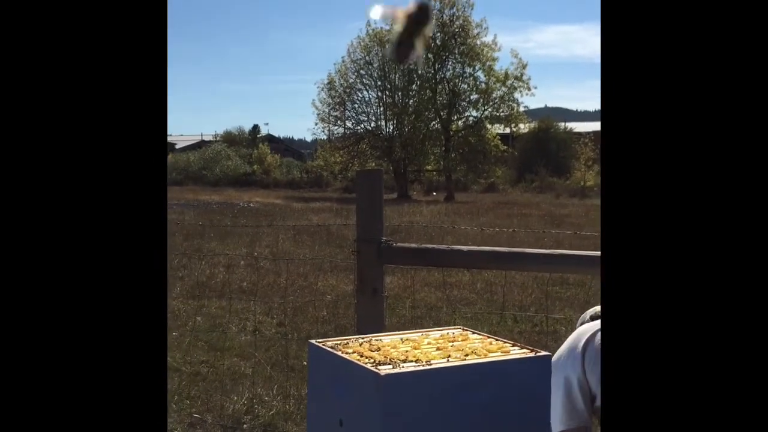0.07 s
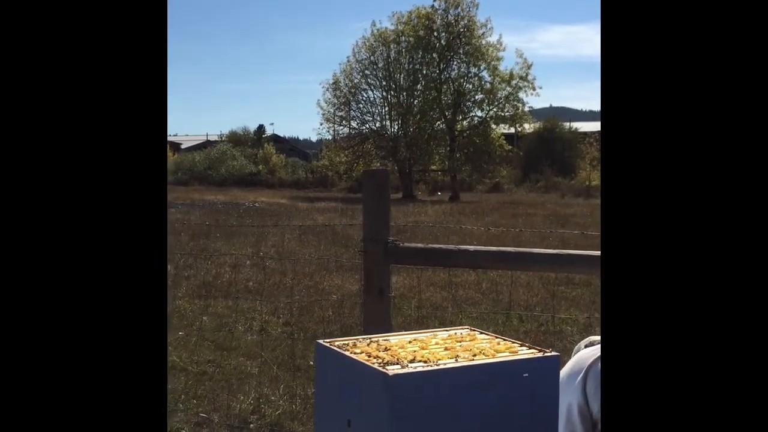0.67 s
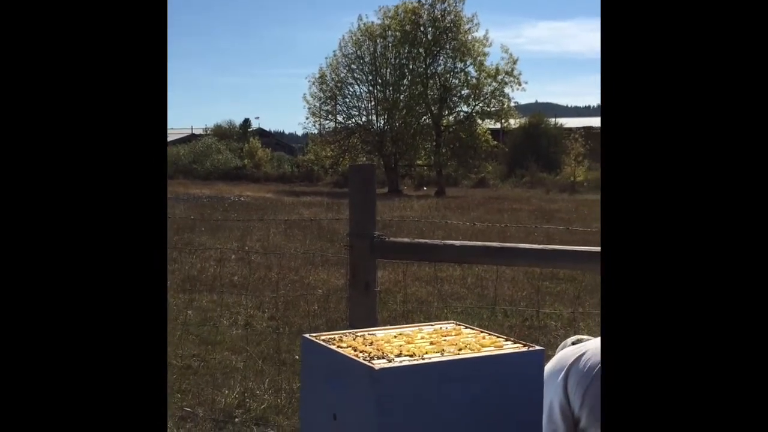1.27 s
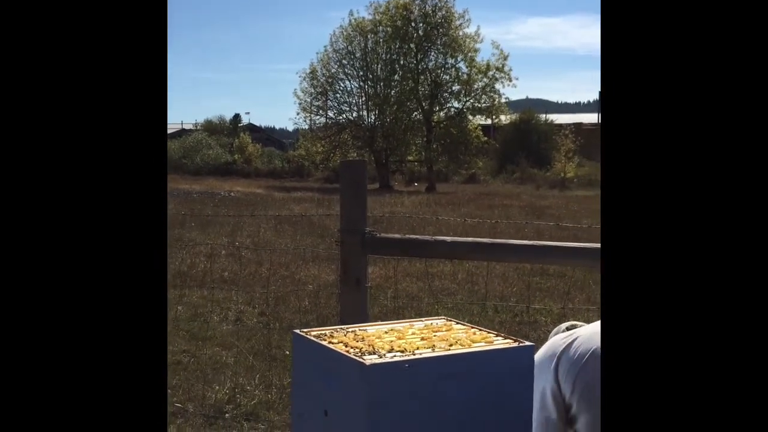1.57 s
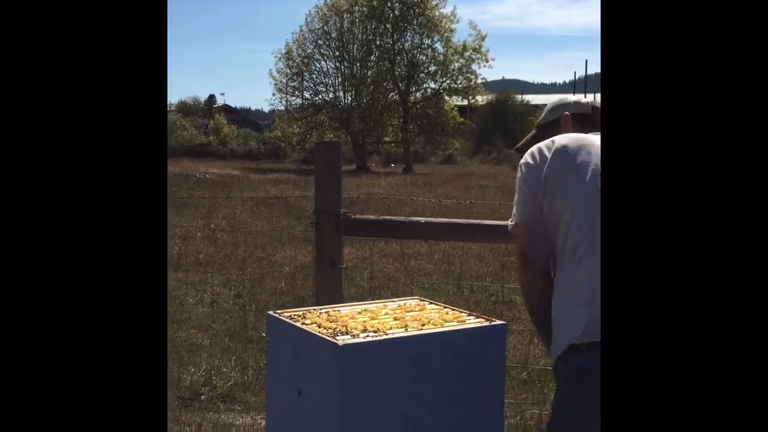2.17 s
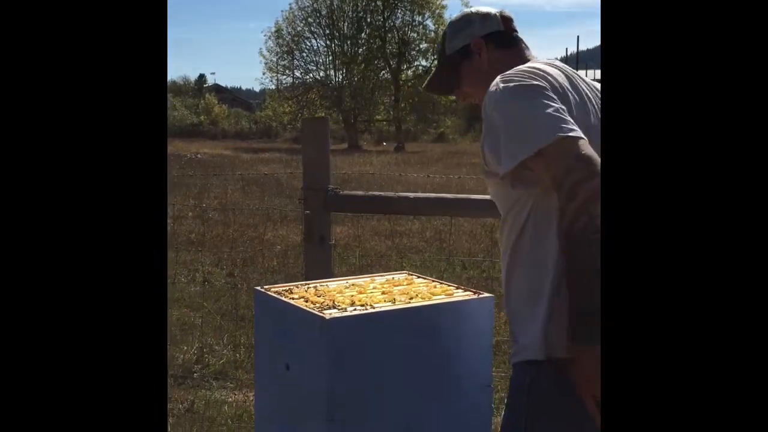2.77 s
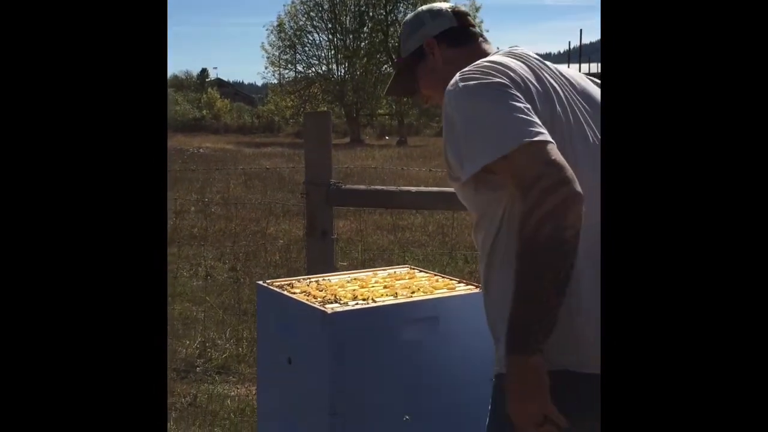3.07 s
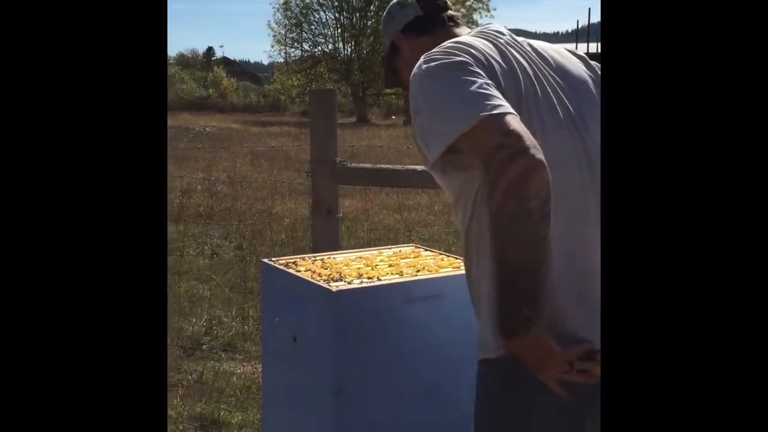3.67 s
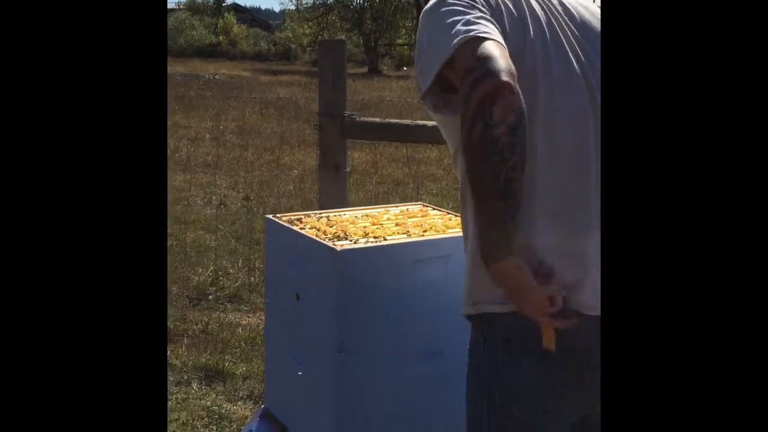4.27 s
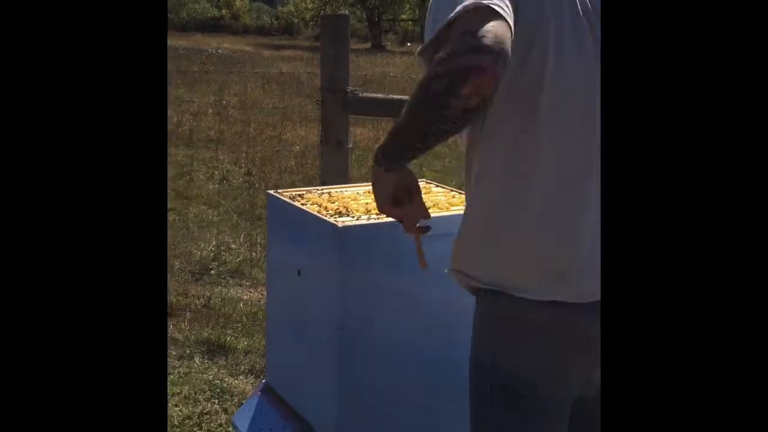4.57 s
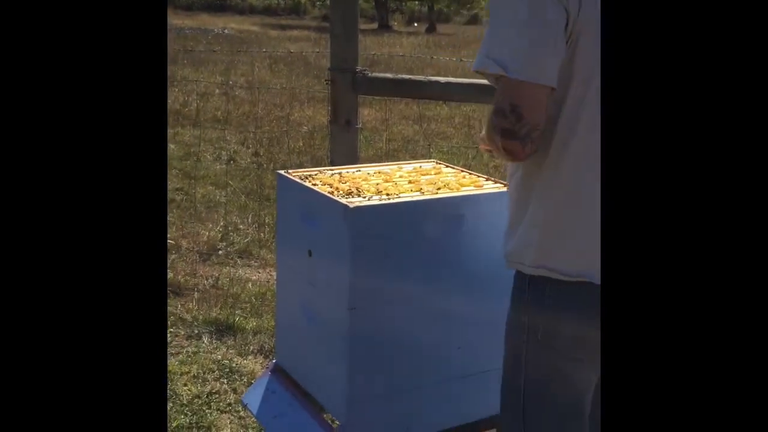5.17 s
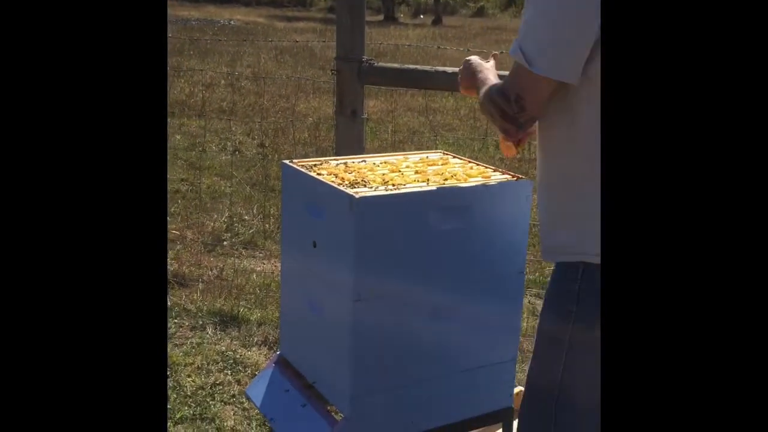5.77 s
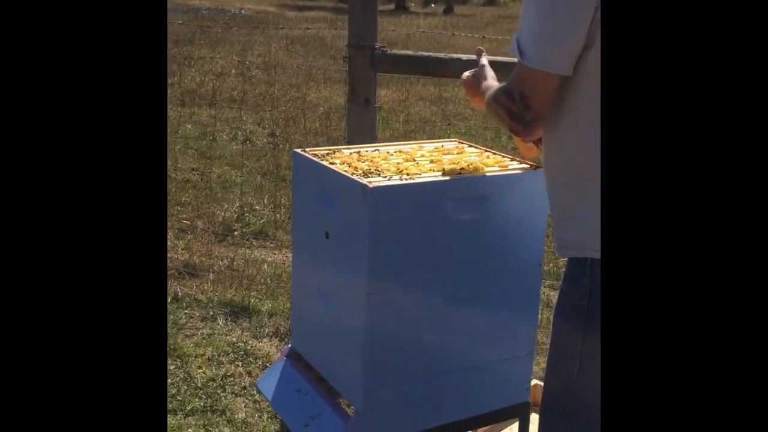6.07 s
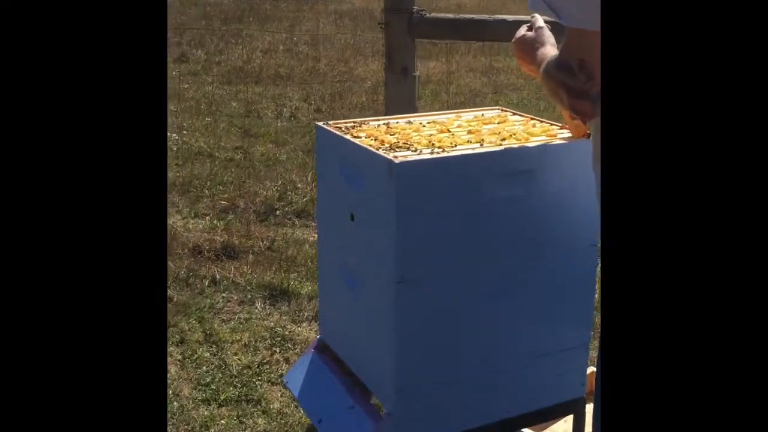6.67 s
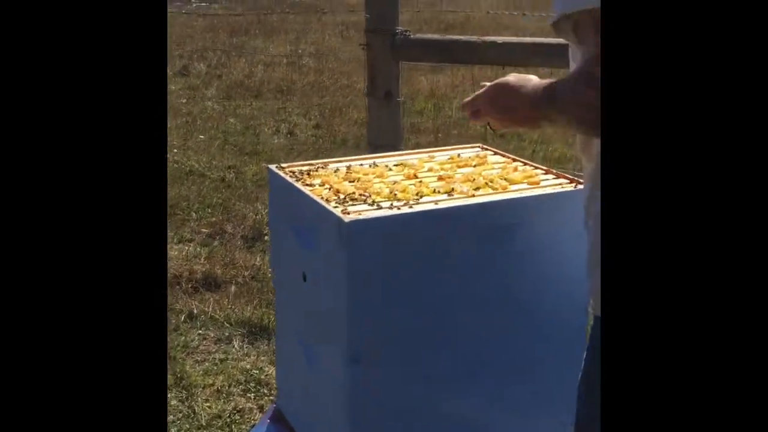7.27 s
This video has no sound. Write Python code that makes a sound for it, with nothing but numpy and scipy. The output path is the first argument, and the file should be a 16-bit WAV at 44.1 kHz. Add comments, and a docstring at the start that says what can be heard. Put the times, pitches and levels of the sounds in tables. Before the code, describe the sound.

Wind thumps on the microphone, then eases over faint bee humming, crickets and distant traffic, with a few small knocks and rustles.

```python
"""An open beehive in a dry field. From the start, beating wings make bees hum faintly and bush crickets
chirp high up, over hissing grass and the tyre noise of a far road. For the first two seconds turbulent
eddies thump hard on the microphone, later only now and then. From about three seconds the beekeeper moves
beside the hive: friction rustles and scrapes, small impacts tick and knock. A far motor swells and fades
around five seconds, and a last knock and rustle end the scene."""
import sys
import numpy as np
from scipy import signal
from scipy.fft import rfft, irfft, next_fast_len
from scipy.io import wavfile
from scipy.ndimage import uniform_filter1d, minimum_filter1d, map_coordinates

SR = 44100
rng = np.random.default_rng(int(sys.argv[2]) if len(sys.argv) > 2 else 0)


def dump(signal):
    """Clip the signal to [-1, 1] and save it as 16-bit WAV at the path in sys.argv[1]."""
    limited = np.clip(np.atleast_2d(signal).T, -1, 1)
    pcm = np.round(limited * 32767).astype(np.int16)
    wavfile.write(sys.argv[1], SR, pcm)


N = 331632

# Levels in the tables are relative: each source applies its own gain.
# dry grass and leaves stirring: time_s, body_db, fizz_db
GRASS_LEVELS = [(0.0, -66, -76.5), (0.6, -70, -82.5), (1.61, -69.5, -82), (1.93, -67, -81.5),
                (2.99, -66.5, -78.5), (3.44, -68.5, -81.5), (4.98, -68.5, -81), (6.43, -68.5, -85),
                (6.79, -67, -79), (7.52, -67.5, -82)]
# lower part of the grass hiss: frequency_hz, density_db
GRASS_BODY_SPECTRUM = [(500, 3.5), (1500, 3.5), (2800, -2.5), (4200, -5.5), (5000, -10), (6200, -9.5),
                       (7500, -13.5), (9100, -7.5), (10400, -39), (15000, -34)]
# upper part of the grass hiss: frequency_hz, density_db
GRASS_FIZZ_SPECTRUM = [(2000, -15), (6000, -4), (9500, 4.5), (10300, -2), (11200, 1.5), (15000, 0)]
# far traffic: time_s, level_db
ROAD_LEVELS = [(0.0, -53), (0.65, -56.0), (3.1, -51.5), (3.45, -56), (3.65, -52.5), (3.95, -43.5),
               (4.3, -52.5), (4.4, -46), (4.85, -49), (4.95, -49), (5.2, -50), (5.55, -48), (5.7, -48.5),
               (6.05, -46.5), (6.5, -48.5), (6.6, -57), (6.8, -49), (7.51, -52.5)]
# tyre noise before the traffic's pace shifts it: frequency_hz, density_db
TYRE_SPECTRUM = [(150, -0.5), (340, -16), (420, -12), (510, -6), (650, -4), (850, 0.5), (1030, 2.5),
                 (1220, -3), (1450, -12.5), (1800, -21), (2500, -49), (5000, -41.5)]
# centre of the tyre noise, following that pace: time_s, centre_hz
TYRE_CENTRES = [(2.3, 804), (3.91, 949.4), (5.37, 906.2), (6.5, 918), (7.0, 1059), (7.52, 905)]
# distant crickets, and a faint series of chirps near 9.5 kHz: pitch_hz, level_db, chirps_per_s
CRICKET_CHORUS = [(8230, -73.5, 2.7), (8600, -78, 5.4), (8900, -77, 3.5), (9500, -80, 3.2)]
# runs of the two nearest crickets: first_s, last_s, chirp_count, pitch_hz, level_db
CHIRP_RUNS = [(0.049, 1.125, 5, 8400, -72), (1.585, 2.566, 5, 8420, -70), (2.894, 4.546, 7, 8340, -71),
              (4.77, 6.022, 4, 8340, -76.5), (6.64, 7.16, 3, 8270, -74), (0.248, 0.503, 2, 8020, -73),
              (1.734, 4.509, 10, 8050, -72), (4.799, 6.478, 6, 7910, -74), (6.814, 7.373, 3, 8000, -71)]
# partials of a wingbeat: harmonic_number, level_db
WING_HARMONICS = [(1, -2), (2, -2.5), (3, -3.5), (4, 0), (5, -0.5), (6, -14.5), (7, -14.5), (8, -18.5),
                  (9, -33.5), (10, -34.5), (11, -35), (12, -22.5)]
# activity of the circling bees: time_s, level_db
SWARM_LEVELS = [(0, 1.5), (.8, -3.5), (2, -3), (2.6, -5.5), (3.4, -3), (4, 2.5), (6.3, 0), (7.52, 0)]
# single bees passing close: nearest_s, half_width_s, wingbeat_hz, glide_hz_per_s, level_db
BEE_FLIGHTS = [(0.153, 0.19, 203, 21.5, -56), (2.851, 0.45, 216.7, 24, -62.5),
               (4.798, 0.14, 258, -37.5, -61), (5.9, 0.56, 250, 12, -57.5), (6.42, 0.15, 270, 61, -57)]
# clothes and feet brushing: centre_s, half_width_s, level_db
RUSTLES = [(0.147, 0.097, -81), (2.83, 0.024, -68), (3.09, 0.027, -64), (3.146, 0.036, -61),
           (4.23, 0.043, -68), (5.04, 0.034, -68), (5.65, 0.05, -67), (6.657, .025, -66),
           (7.43, 0.022, -66.5), (7.495, .04, -59)]
# friction noise of a rustle: frequency_hz, density_db
RUSTLE_SPECTRUM = [(800, 8), (2500, 2), (4500, -6), (6000, 0.5), (9000, -3), (10300, -7), (12500, -1.5),
                   (15000, -11)]
# short dry scrapes: centre_s, half_width_s, level_db
SCRAPES = [(2.7, .2, -74), (2.98, 0.18, -70), (4.38, 0.033, -66), (5.48, .012, -67), (6.352, 0.024, -67.5)]
# friction noise of a scrape: frequency_hz, density_db
SCRAPE_SPECTRUM = [(900, -45), (1600, 7), (3000, 6.5), (4500, -16), (7000, -25), (10000, -35)]
# dry fibres breaking: centre_s, level_db
SNAPS = [(3.087, -58), (3.133, -54), (3.157, -57), (6.931, -62), (7.014, -62.5)]
# crackle of a breaking fibre: frequency_hz, density_db
SNAP_SPECTRUM = [(1000, -19), (6000, 4), (10000, -6), (13000, 1), (15000, 0)]
# small contacts of the keeper's handling: start_s, level_db, ring_db, crack_db
TICKS = [(3.041, -64, -3, -14), (3.084, -63, -17, -4), (5.440, -55, -7, -5), (5.4443, -53, -6, -9),
         (6.347, -61, -10, -17), (7.471, -66, -9, -9)]
# resonances of a tick: frequency_hz, level_db, t60_s
TICK_MODES = [(1950, -3, 0.051), (2870, 0.5, 0.033), (4030, -6, 0.026), (5900, -11, .015)]
# soft knocks on wood: start_s, level_db
KNOCKS = [(3.086, -47), (4.368, -49), (6.291, -58), (6.345, -46), (7.471, -45.5)]
# resonances of the wood: frequency_hz, level_db, t60_s
WOOD_MODES = [(810, 5, 0.03), (1075, 7, 0.042), (1480, 1, 0.029)]
# strength of the wind between puffs: time_s, level_db
WIND_LEVELS = [(0.0, -36), (1.05, -33.5), (1.2, -40.5), (1.7, -28.5), (2.35, -43.5), (2.65, -42),
               (2.8, -51.5), (3.05, -40), (3.4, -41.5), (3.55, -52.5), (3.9, -56), (4.2, -38),
               (4.35, -54.5), (4.6, -45.5), (6.35, -39.5), (6.6, -49), (6.75, -44), (7.51, -38)]
# rumble of light air: frequency_hz, density_db
BREEZE_SPECTRUM = [(15, -44), (30, -18), (50, -1), (80, -0.5), (110, -1), (145, -10.5), (200, -13.5),
                   (320, -28), (600, -60.5), (1500, -120)]
# sharpest slaps of air inside the puffs: centre_s, peak_db
AIR_SLAPS = [(.459, -24), (.484, -21), (.660, -18), (.972, -18), (1.247, -18.5), (1.2702, -8), (1.362, -13),
             (1.406, -16.5), (1.491, -14), (1.645, -19.5), (1.902, -26.5), (2.052, -22.5)]
# big eddies striking the microphone: centre_s, half_width_s, level_db, nominal_cutoff_hz
BIG_EDDIES = [(0.032, 0.006, -20, 118), (0.107, 0.0065, -27.5, 110), (0.251, 0.011, -20.5, 110),
              (0.43, 0.026, -18.5, 224), (0.482, 0.021, -21, 242), (0.671, 0.023, -19.5, 319),
              (0.721, 0.019, -24, 226), (0.808, 0.027, -25, 211), (0.851, 0.013, -19, 127),
              (0.909, 0.0088, -22.5, 204), (0.967, 0.02, -21, 293), (1.118, 0.01, -24, 145),
              (1.268, 0.018, -14.5, 480), (1.358, 0.032, -18.5, 385), (1.418, 0.012, -16.5, 430),
              (1.498, 0.022, -20, 424), (1.64, 0.017, -23, 237), (1.788, 0.013, -25, 259),
              (1.888, 0.015, -28.5, 290), (2.044, 0.039, -27, 200), (2.166, 0.0075, -29.5, 230),
              (2.235, 0.012, -32, 107), (2.609, 0.012, -30, 204), (3.115, 0.012, -31, 125),
              (3.307, 0.013, -30, 101), (4.166, 0.014, -27, 174), (6.043, 0.017, -24.5, 126),
              (6.235, 0.024, -34.5, 116), (6.413, 0.043, -34.5, 89), (6.502, 0.015, -31.5, 89),
              (7.147, 0.022, -35, 106), (7.325, 0.0095, -31.5, 102)]


def amp(db):
    """Amplitude grows tenfold with every 20 dB."""
    return 10 ** (np.asarray(db) / 20)


def unit(x):
    """Normalisation to rms 1."""
    return x / np.sqrt(np.mean(x ** 2) + 1e-20)


def clock():
    """Uniform sampling: the time of every sample in seconds."""
    return np.arange(N) / SR


def curves(rows):
    """Linear interpolation: one value per sample for each column after the time."""
    times, *columns = np.transpose(rows)
    return [np.interp(clock(), times, column) for column in columns]


def wobble(rate):
    """Smooth random modulation: a spline through `rate` Gaussian knots a second."""
    steps = np.arange(0, N / SR * rate + 1, 1 / 10)
    knots = rng.standard_normal(int(N * rate / SR) + 4)
    return np.interp(clock() * rate, steps, map_coordinates(knots, [steps]))


def bell(x, half):
    """A Gaussian around zero; its half-width is one standard deviation."""
    return np.exp(-.5 * (x / half) ** 2)


def filtered(x, response):
    """Linear filtering multiplies the spectrum by a frequency response."""
    size = next_fast_len(len(x) + 8192)
    return irfft(rfft(x, size) * response(np.fft.rfftfreq(size, 1 / SR)), size)[:len(x)]


def noise(spectrum):
    """Spectral shaping turns white noise into coloured noise of rms 1."""
    knots_hz, db = np.transpose(spectrum)
    response = lambda hz: amp(np.interp(np.log(hz + 1), np.log(knots_hz), db))
    return unit(filtered(rng.standard_normal(N), response))


def add(out, start_s, x):
    """Superposition: x adds to out from start_s on."""
    start = round(start_s * SR)
    x = x[max(-start, 0):max(N - start, 0)]
    out[max(start, 0):][:len(x)] += x


def grass(body_db=5.5, fizz_db=6.0):
    """Stirring blades and leaves sum incoherently to a soft broadband hiss."""
    body, fizz = curves(GRASS_LEVELS)
    body_hiss = amp(body + body_db) * noise(GRASS_BODY_SPECTRUM)
    return body_hiss + amp(fizz + fizz_db) * noise(GRASS_FIZZ_SPECTRUM)


def shimmer(x, depth_db=2.2):
    """Scintillation: moving air strengthens and weakens narrow bands of a far sound."""
    bands = signal.stft(x, nperseg=2048)[2]
    fading = uniform_filter1d(rng.standard_normal(bands.shape), size=3, axis=0)
    fading = unit(uniform_filter1d(fading, size=4, axis=1))
    return unit(signal.istft(bands * amp(depth_db * fading), nperseg=2048)[1][:N])


def road(gain_db=-0.47, flutter_db=1.55, unshifted_hz=950):
    """Rolling noise: the spectrum of the tyres shifts upward with the speed of the cars."""
    db, centre_hz = curves(ROAD_LEVELS) + curves(TYRE_CENTRES)
    read_position = np.cumsum(centre_hz / unshifted_hz)
    tyres = map_coordinates(shimmer(noise(TYRE_SPECTRUM)), [read_position], mode="mirror")
    return amp(db + gain_db + flutter_db * wobble(16)) * tyres


def motor(drone_hz=180, level_db=-58.5, nearest_s=5.27, half_s=1.04):
    """Level falls with distance: a passing motor's drone swells, wavers on the wind and fades."""
    pitch_hz = drone_hz * (1 + .018 * wobble(9))
    swell = amp(level_db + 4 * wobble(8)) * bell(clock() - nearest_s, half_s)
    return swell * unit(np.sin(2 * np.pi * np.cumsum(pitch_hz) / SR))


def chirp(pitch_hz, half_s, stroke_hz=121, glide_hz_per_s=1500):
    """Stridulation: quick strokes drive a wing resonance at a slightly rising, raspy pitch."""
    t = np.arange(-SR // 10, SR // 10) / SR
    strokes = 1 + 0.44 * np.cos(2 * np.pi * (stroke_hz * rng.normal(1, .03) * t + rng.random()))
    phase = 2 * np.pi * (pitch_hz * t + .5 * glide_hz_per_s * t ** 2)
    rasp = lambda: .65 * unit(filtered(rng.standard_normal(len(t)), lambda hz: bell(hz, 220)))
    tone = (1 + rasp()) * np.cos(phase) + rasp() * np.sin(phase)
    return unit(strokes * tone) * bell(t ** 2, half_s ** 2)  # flat-topped envelope


def crickets(near_db=2.5, lead_s=0.1):
    """Nearly periodic calls superpose: two close crickets chirp over a distant chorus."""
    out = np.zeros(N)
    for first_s, last_s, count, hz, db in CHIRP_RUNS:
        for s in np.linspace(first_s, last_s, round(count)):
            late, sharp, loud = rng.standard_normal(3)
            call = chirp(hz + 45 * sharp, half_s=0.035)
            add(out, s + 0.011 * late - lead_s, amp(db + near_db + 1.8 * loud) * call)
    for hz, db, rate in CRICKET_CHORUS:
        for beat, (late, sharp, loud) in enumerate(rng.standard_normal((36, 3))):
            s = (beat + 0.24 * late) / rate
            if s < N / SR:
                add(out, s - lead_s, amp(db + 2 * loud) * chirp(hz + 50 * sharp, half_s=0.042))
    return out


def buzz(wingbeat_hz):
    """An unsteady wingbeat radiates a harmonic series, each partial fading in and out as the bee turns."""
    shake = 1 + .009 * wobble(18)
    phase = 2 * np.pi * np.cumsum(wingbeat_hz * shake) / SR
    partials = (amp(db + 4.6 * wobble(8)) * np.sin(round(k) * phase + rng.uniform(0, 2 * np.pi))
                for k, db in WING_HARMONICS)
    return unit(sum(partials))


def bees(count=7, wing_hz=235, spread=.13, level_db=-59, dip_hz=375, dip_half_hz=60, dip_db=-10):
    """Circling bees with unequal wing rates beat together in a hum; now and then one passes close."""
    swarm = sum(amp(0.5 * wobble(2.97)) * buzz(wing_hz * (1 + spread * offset + .03 * wobble(3)))
                for offset in np.linspace(-1, 1, count))
    out = amp(level_db + curves(SWARM_LEVELS)[0]) * unit(swarm)
    for nearest_s, half_s, wingbeat_hz, glide_hz_per_s, db in BEE_FLIGHTS:
        t = clock() - nearest_s
        pitch_hz = (wingbeat_hz + glide_hz_per_s * np.clip(t, -1, 1)) * (1 + .012 * wobble(5))
        out += amp(db) * bell(t, half_s) * buzz(pitch_hz)
    # a notch stands for the ground reflection cancelling the low middle
    return filtered(out, lambda hz: amp(dip_db * bell(hz - dip_hz, dip_half_hz)))


def noise_swells(rows, spectrum, grain_db):
    """Amplitude modulation shapes noise into swells; fast random modulation adds grain."""
    swell = sum(amp(db) * bell(clock() - s, half_s) for s, half_s, db in rows)
    return swell * unit(amp(grain_db * wobble(500)) * noise(spectrum))


def friction():
    """Sliding friction: the keeper's clothes and dry stalks brush and scrape."""
    rustles = noise_swells(RUSTLES, RUSTLE_SPECTRUM, grain_db=0.5)
    return rustles + noise_swells(SCRAPES, SCRAPE_SPECTRUM, grain_db=6.0)


def snaps(half_s=.0007, gain_db=3.5):
    """Brittle fracture: each dry fibre breaks in a millisecond or so of bright crackle."""
    return noise_swells([(s, half_s, db + gain_db) for s, db in SNAPS], SNAP_SPECTRUM, grain_db=0)


def ring(modes, t):
    """Free vibration: each mode of a struck body is an exponentially damped sine."""
    return sum(amp(db - 60 * t / t60) * np.sin(2 * np.pi * hz * t) for hz, db, t60 in modes)


def impacts(tick_db=13.0, crack_t60_s=0.014, crack_hz=8000, knock_attack_s=0.00056):
    """Impact excites modes: the keeper's small contacts tick with a crack, or knock softly on wood."""
    out, t = np.zeros(N), np.arange(SR // 10) / SR
    for s, db, ring_db, crack_db in TICKS:
        hiss = filtered(rng.standard_normal(len(t)), lambda hz: bell(hz ** 2, crack_hz ** 2))
        crack = amp(crack_db - 60 * t / crack_t60_s) * hiss
        add(out, s, amp(db + tick_db) * (amp(ring_db) * ring(TICK_MODES, t) + crack))
    for s, db in KNOCKS:
        add(out, s, amp(db) * (1 - np.exp(-t / knock_attack_s)) * ring(WOOD_MODES, t))
    return out


def breeze(gain_db=-4.0, lumpy_db=4.0):
    """Pressure fluctuations in light air keep a lumpy rumble on the microphone."""
    db, = curves(WIND_LEVELS)
    return amp(db + gain_db) * unit(amp(lumpy_db * wobble(17)) * noise(BREEZE_SPECTRUM))


def turbulence(hz, top_hz, low_hz=60, slope=0.94):
    """A power-law spectrum ends steeply at the finest swirls; the microphone sheds the deepest part."""
    hz = hz + 1
    bass_loss = 1 + (low_hz / hz) ** 10
    treble_loss = (1 + (hz / top_hz) ** 6) * (1 + (hz / (1.7 * top_hz)) ** 12)
    return hz ** -slope / np.sqrt(bass_loss * treble_loss)


def slaps(gain_db=-1.0, mean_rebound_s=0.00704, rebound_db=-5, ref_hz=560, ref_db=-16.5, octave_db=10.5):
    """A pressure impulse: an eddy breaks on the microphone port, pushes and pulls, then rebounds."""
    out, t = np.zeros(N), np.arange(-SR // 30, SR // 30) / SR
    impulse = (t == 0).astype(float)
    for s, db in AIR_SLAPS:
        for delay_s, peak_db in [(0, db), (mean_rebound_s * (.5 + rng.random()), db + rebound_db)]:
            top_hz = ref_hz * 2 ** ((peak_db - ref_db) / octave_db)  # a harder slap reaches higher
            rotation = np.exp(2j * np.pi * rng.random())
            slap = filtered(impulse, lambda hz: rotation * turbulence(hz, top_hz, low_hz=200, slope=0.6))
            add(out, s + delay_s + t[0], amp(peak_db + gain_db) * slap / np.abs(slap).max())
    return out


def eddy(half_s, top_hz, lumpy_db=5.0, lumps_per_s=110):
    """A passing vortex is a short lumpy swell of turbulent pressure, centred in a third of a second."""
    t = np.arange(-SR // 6, SR // 6) / SR
    swell = bell(t, half_s)
    lumps = amp(lumpy_db * map_coordinates(rng.standard_normal(64), [(t - t[0]) * lumps_per_s]))
    stir = swell * lumps * rng.standard_normal(len(t))
    return np.sqrt(np.mean(swell ** 2)) * unit(filtered(stir, lambda hz: turbulence(hz, top_hz)))


def puffs(gain_db=-1.0, cutoff_scale=1.21, eddies_per_s=6, over_wind_db=1.5, scatter_db=3):
    """Turbulence has many scales: big eddies thump, small ones flutter with the wind's strength."""
    out, lead_s = np.zeros(N), (SR // 6) / SR
    for s, half_s, db, nominal_hz in BIG_EDDIES:
        add(out, s - lead_s, amp(db + gain_db) * eddy(half_s, cutoff_scale * nominal_hz))
    for beat, (late, loud) in enumerate(rng.uniform(-0.81, 1, size=(48, 2))):
        s = (beat + late / 2) / eddies_per_s
        db = np.interp(s, *np.transpose(WIND_LEVELS)) + over_wind_db + scatter_db * loud
        add(out, s - lead_s, amp(db) * eddy(half_s=0.0091, top_hz=110))
    return out


def scene():
    """Superposition: the pressures of all sources add at one microphone."""
    wind = puffs() + slaps() + breeze()
    field = road() + motor() + bees() + crickets() + grass()
    keeper = friction() + impacts() + snaps()
    return (wind + field + keeper)[None]


def record(dry, ceiling=0.42, top_hz=15250):
    """Peak limiting holds down thumps above the ceiling; band limiting removes all above top_hz."""
    needed_gain = ceiling / np.maximum(np.abs(dry[0]), ceiling)
    gain = uniform_filter1d(minimum_filter1d(needed_gain, size=400), size=300)
    return filtered(dry[0] * gain, lambda hz: hz < top_hz)[None]


dry = scene()
out = record(dry)
dump(out)
```